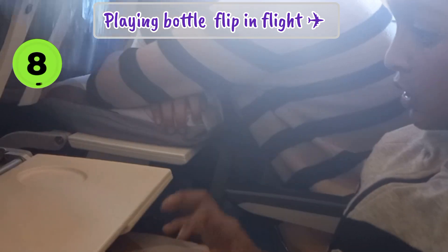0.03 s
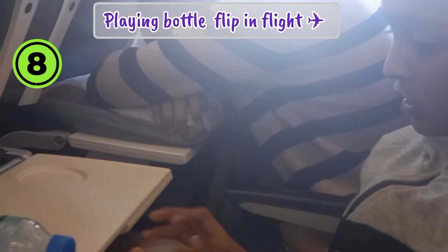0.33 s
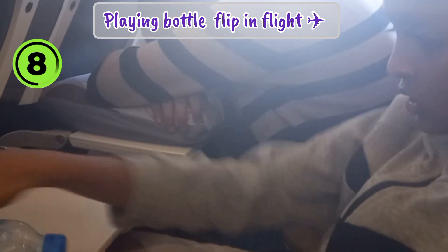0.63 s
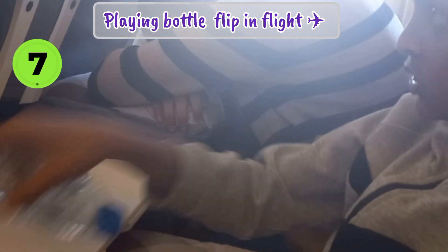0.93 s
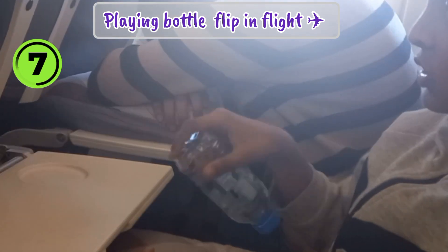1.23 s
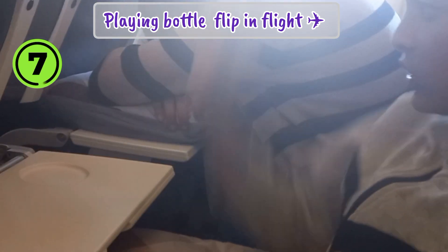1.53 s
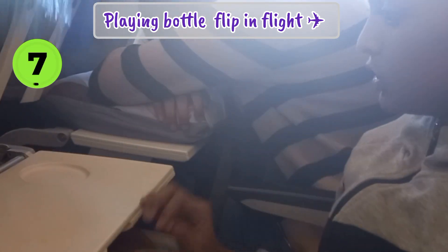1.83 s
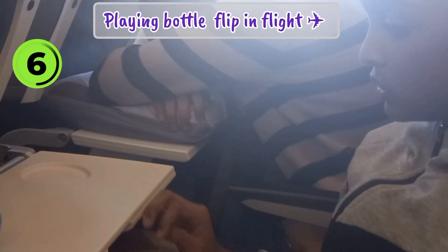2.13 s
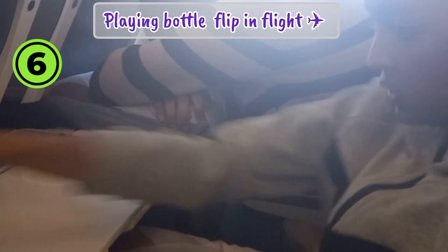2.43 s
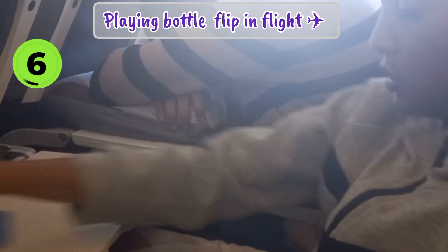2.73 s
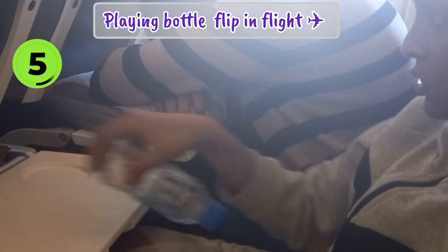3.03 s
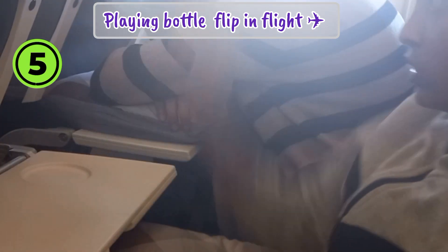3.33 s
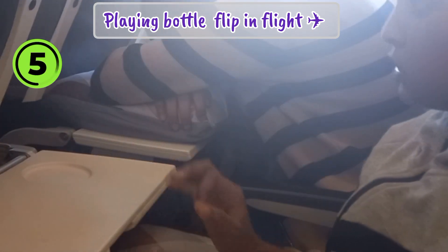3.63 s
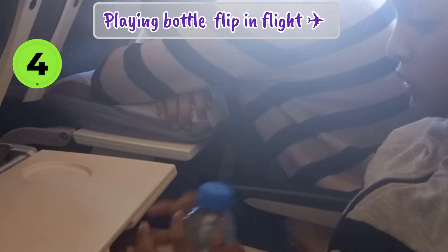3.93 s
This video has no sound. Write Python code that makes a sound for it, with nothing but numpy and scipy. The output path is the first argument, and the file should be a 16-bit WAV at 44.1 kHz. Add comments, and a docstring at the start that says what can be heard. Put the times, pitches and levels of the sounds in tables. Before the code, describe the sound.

A plastic water bottle lands on a tray table three times, each a quick, close clatter of cracks and thumps. Faint sleeve swishes and a lighter knock come between landings, over an aircraft cabin's steady drone and vent hiss.

```python
"""In an airliner cabin, a part-filled plastic water bottle is flipped onto a tray table three times.
Each landing is a quick cluster of hits: the thin shell buckles, cracks and rings, the tray thumps,
and the seats and wall return a short echo. Between throws a hand grabs the bottle and a sleeve
brushes past; two faint squeaks come before the last landing. Under it all, engines and airflow
drone and the air vents hiss."""
import sys
import numpy as np
from scipy import signal
from scipy.fft import rfft, irfft
from scipy.io import wavfile

SR = 44100
rng = np.random.default_rng(int(sys.argv[2]) if len(sys.argv) > 2 else 0)


def pcm_store(signal):
    """Save signal as 16-bit PCM."""
    levels = np.round(np.clip(np.atleast_2d(signal), -1, 1) * 32767)
    wavfile.write(sys.argv[1], SR, levels.astype(np.int16).T)


N = 176400  # 4 seconds

# How alike the two ears hear the crack and the cloth (frequency [Hz], likeness [1 = the same])
CLOSE_LIKENESS = [(400, 1.1), (1000, 0.1), (3000, -0.36), (12000, 0.5)]
# How alike the two ears hear the drone and the hiss (frequency [Hz], likeness [1 = the same])
AIR_LIKENESS = [(40, .97), (70, .99), (170, .989), (230, .98), (295, .93), (380, .91), (480, .88),
                (650, .62), (1000, .3), (1400, .05), (3000, -.13), (7000, 0)]
# Which side the drone, hiss and cloth lean to (frequency [Hz], left minus right [dB])
AIR_BALANCE = [(65, 1.6), (120, .5), (290, .3), (480, -1.7), (660, -2.6), (1400, 3), (3100, 6.5), (6800, 5),
               (14000, 10.5)]
SHELL_LEFT_DB = 4  # the shell's ring and the squeaks are this much louder on the left


def bottle():
    """Landings, bounces and grabs: at each hit the shell cracks and rings and the tray thumps."""
    # Hits on the bottle (time [s], crack gain [dB], thump gain [dB], ring gain [dB], crack brightness
    # [dB per octave], crack low-end boost [dB], pitch of the struck spot [Hz], time to buckle [s])
    hits = [ (0.1541, -11, -7.5, -27, 0, -1.5, 3880, 0.00011), (0.1604, -16, -3, -28, -3, -5, 4100, .0002),
            (0.1657, -16, -18, -23, 0.5, 2, 2360, 0.00017), (0.1723, -31, -27, -24, 4, -3, 3900, .0002),
            (0.185, -26, -36, -26, 0, -1, 4300, .0015), (0.2000, -22, -35, -19, -0.5, -3, 6600, .0001),
            (0.204, -26, -30, -32, 1, 3, 1750, .0002), (0.2098, -32, -23, -30, 2, 2, 4700, .0003),
            (1.9481, -14.5, -15, -13.5, 1.5, 7, 4830, 0.00028),
            (1.9541, -24, -6.5, -14.5, 5.5, 9, 4630, 0.00027), (1.9619, -19, -15, -27, -4, -5, 5300, .0005),
            (1.968, -17, -33, -23, 2.5, 0, 4700, 0.00063), (1.9751, -20, -21, -20, 2, -4, 5300, 0.00037),
            (1.9780, -26, -31, -19, -1, -2, 3000, .0002), (1.9809, -34, -28, -28, -4, -3, 2330, 0.00027),
            (1.9960, -39, -40, -32, -2, -5, 3900, .001), (2.088, -53, -36, -44, 3, -4, 4800, .0002),
            (2.117, -47, -32, -39, 1, -3, 4800, .0002), (2.389, -52, -51, -52, 8, 2, 6000, .0002),
            (2.4973, -45, -38, -51, 3, -1, 5000, .0002), (2.5219, -27.5, -34, -26, 0.5, 3, 5240, 0.00033),
            (3.5847, -51, -51, -52, 9, 0, 5000, .0005), (3.7933, -18.5, -18, -15.5, 0, -13, 3750, .0001),
            (3.7948, -27, -9.5, -19.5, -4, 6, 4700, .0002), (3.7979, -22, -24, -15, 2, -4, 2750, .0002),
            (3.8040, -23, -27, -23.5, -2, 1, 2400, .0003), (3.8133, -19.5, -22, -27, 0.5, 0.5, 5400, .0002),
            (3.8190, -33, -39, -39, -4, 9, 4700, .0004)]
    t = np.arange(6000) / SR
    out = np.zeros((2, N))
    for start, crack_db, thump_db, ring_db, bright_db, body_db, spot_hz, buckle_s in hits:
        crack = amp(crack_db) * shell_crack(t, bright_db, body_db, spot_hz)
        thump = amp(thump_db) * tray_thump(t)
        ring = amp(ring_db) * shell_ring(t, spot_hz)
        buckle = 1 - np.exp(-t / buckle_s)
        add(out, start, buckle * (crack + ring) + thump)
    return out


def shell_crack(t, bright_db, body_db, spot_hz):
    """Thin plastic buckles in many tiny, uneven snaps that blur into a burst of noise."""
    # Tone colour of the crack (frequency [Hz], relative level [dB])
    spectrum = [(40, -38), (150, -21), (500, 8.5), (1100, 7.5), (1500, -2), (2500, 3.5), (4600, 3),
                (5600, -2.5), (6600, -6.5), (8700, -18), (12400, -9), (16000, -21.5)]
    # How long the crack lasts (frequency [Hz], time to fade by 60 dB [s])
    fade_times = [(400, 0.032), (2000, 0.078), (5000, 0.018), (12000, 0.044)]
    # Which side the crack leans to (frequency [Hz], left minus right [dB])
    balance = [(400, 1), (1000, 1), (1700, 0), (2700, 5), (4000, -0.5), (5300, 2), (6800, -12),
               (8500, -4.5), (12000, 6)]
    hz = np.fft.rfftfreq(len(t), 1 / SR)
    octaves_away = np.log2((hz + 1) / spot_hz)
    boost_db = 4 * np.exp(-(octaves_away / .16) ** 2)  # stronger near the struck spot's pitch
    colour = np.transpose([hz, read(spectrum, hz) + boost_db])
    burst = noise(len(t), colour, CLOSE_LIKENESS, balance, bright_db, body_db)
    bite = amp(2.5 * np.exp(-t / .001))  # a little louder in the first millisecond
    return die_away(burst, fade_times) * bite * grain(len(t), depth_db=2, rate_hz=900)


def shell_ring(t, spot_hz):
    """The shell rings at its own tones, each 17 dB weaker per octave from the struck spot's pitch."""
    # Natural tones of the bottle (frequency [Hz], relative level [dB], time to fade by 60 dB [s])
    tones = [(1698, 2, 0.064), (2360, 1, 0.033), (2706, -1, 0.016), (2980, -6.5, .028), (3790, -3, 0.012),
             (3930, -6, 0.024), (4440, -5, 0.028), (4637, -3, 0.032), (5100, -3.5, 0.02),
             (5340, -3.5, 0.021), (6800, -14, .024)]
    struck = [(hz, db - 17 * abs(np.log2(hz / spot_hz)), fade_s) for hz, db, fade_s in tones]
    return ringing(struck, t, lead_s=.00004, detune=.015) * sides(SHELL_LEFT_DB)


def tray_thump(t):
    """The bottle pushes the tray down and it vibrates; so small a panel gives off little deep bass."""
    # Natural tones of the tray (frequency [Hz], relative level [dB], time to fade by 60 dB [s])
    tones = [(237, -8, 0.12), (332, -1, 0.025), (397, 0, 0.061), (423, -13.5, 0.045), (505, -15.5, 0.05),
             (650, -13.5, 0.057), (753, -12.5, 0.046), (960, -18, 0.05), (1190, -28.5, 0.052)]
    rise = 1 - np.exp(-t / .00066)
    thump = -ringing(tones, t, lead_s=.0001, detune=.024) * rise * sides(-1.3)
    bass_cut = signal.butter(2, 121, "high", fs=SR)
    return signal.lfilter(*bass_cut, thump)


def cabin_echo(sound, size=14000):
    """A short, blurred echo off the seat backs and wall; the seats soon soak it up."""
    # How long the echo lasts (frequency [Hz], time to fade by 60 dB [s])
    fade_times = [(300, 0.04), (3000, 0.16), (12000, 0.14)]
    rise = 1 - np.exp(-np.arange(size) / SR / .006)
    tail = die_away(rng.standard_normal((2, size)), fade_times) * rise
    tail /= np.linalg.norm(tail[0])
    return amp(-17) * signal.fftconvolve(sound, tail, axes=1)[:, :N]


def sleeve():
    """Cloth rubs in soft, grainy swishes as the arm reaches over the tray."""
    # Brushes of sleeve and hand (middle time [s], half length [s], level [dB])
    brushes = [(.915, .045, -49), (1.143, 0.019, -46), (1.4, .06, -58), (1.58, .06, -53), (1.82, .07, -53),
               (2.51, 0.035, -51), (2.572, .012, -52), (3.892, 0.021, -44)]
    # Tone colour of rubbing cloth (frequency [Hz], relative level [dB])
    colour = [(400, -13), (2000, 7.5), (4500, 2.5), (8000, -18.5), (12000, -7), (16000, -17)]
    t = np.arange(N) / SR
    strokes = sum(amp(db) * np.exp(-((t - middle) / half_s) ** 2) for middle, half_s, db in brushes)
    return strokes * grain(N, depth_db=3, rate_hz=100) * noise(N, colour, CLOSE_LIKENESS, AIR_BALANCE)


def squeaks():
    """Two faint squeaks during the last throw: short tones that flutter and sink a little in pitch."""
    # The squeaks (middle time [s], half length [s], pitch [Hz], glide [Hz per s], level [dB])
    chirps = [(3.259, .014, 2330, -300, -46), (3.318, .02, 2285, -900, -45)]
    smoothing = np.exp(-np.pi * 50 / SR)  # the flutter spreads each tone over about 50 Hz
    out = np.zeros((2, N))
    for middle, half_s, hz, glide, db in chirps:
        t = np.arange(N) / SR - middle
        wobble = signal.lfilter([1], [1, -2 * smoothing, smoothing ** 2], rng.standard_normal(N))
        flutter = 1 + .25 * unit_level(wobble)
        tone = np.sin(2 * np.pi * (hz * t + glide * t ** 2 / 2))
        out += amp(db) * np.exp(-(t / half_s) ** 2) * flutter * tone * sides(SHELL_LEFT_DB)
    return out


def engine_drone():
    """Engines and airflow make a low, gently swelling drone, nearly alike in both ears."""
    # Tone colour of the drone (frequency [Hz], relative level [dB])
    colour = [(20, -56.5), (32, -48), (50, -23), (62, -15), (80, -9), (100, -2), (120, 0.5), (146, -6),
              (180, -0.5), (260, -2.5), (350, -5), (420, -11.5), (480, -8.5), (600, -16), (800, -22.5),
              (1050, -21), (1600, -28), (2400, -37), (3300, -50), (5000, -56), (9000, -85)]
    # Slow swell of the drone (time [s], level change [dB])
    swell = [(0, 2), (.14, 1), (.25, -1), (1.1, -1), (1.4, 0.5), (1.85, 1.5), (2.05, -1), (2.9, -1),
             (3.3, .5), (3.7, 1), (4, 0)]
    return amp(-19) * level(swell) * noise(N, colour, AIR_LIKENESS, AIR_BALANCE)


def vent_hiss():
    """Air hisses out of the vents, mostly on the left."""
    # Tone colour of the hiss (frequency [Hz], relative level [dB])
    colour = [(300, -18.5), (2000, -3), (3400, -1), (4450, 3), (5300, -8), (6500, -13), (8200, -20.5),
              (10000, -15.5), (12500, -13.5), (14200, -20), (16000, -32)]
    # Loudness of the hiss (time [s], level [dB])
    loudness = [(0, -52.5), (.7, -52.5), (1.25, -54), (1.36, -49), (1.58, -51), (1.68, -50.5),
                (1.88, -50.5), (2.1, -54), (2.55, -52.5), (3.0, -54), (3.5, -52), (4, -52.5)]
    return level(loudness) * noise(N, colour, AIR_LIKENESS, AIR_BALANCE)


def ringing(tones, t, lead_s, detune):
    """Fading tones, slightly retuned for each hit, that reach the left ear first."""
    hz, db, fade_s = np.transpose(tones)[:, :, None]
    hz = hz * (1 + detune * rng.uniform(-1, 1, hz.shape))
    fade = amp(db) * np.exp(-np.log(1000) * t / fade_s)
    ear_times = (t, np.maximum(t - lead_s, 0))
    return np.array([(fade * np.sin(2 * np.pi * hz * ear_t)).sum(0) for ear_t in ear_times])


def noise(size, colour, likeness, balance, bright_db=0, body_db=0):
    """Stereo noise of a given colour; bright_db tilts it per octave, body_db shifts it below 2 kHz."""
    # How far the left ear's wave runs ahead of the right's (frequency [Hz], phase lead [radians])
    left_lead = [(130, 0.012), (370, 0), (650, .56), (1000, 0.94), (3000, 0.91)]
    hz = np.fft.rfftfreq(size, 1 / SR)
    left, unrelated = rfft(rng.standard_normal((2, size)))
    alike = np.clip(read(likeness, hz), -.999, .999)
    right = alike * left * np.exp(-1j * read(left_lead, hz)) + np.sqrt(1 - alike ** 2) * unrelated
    spectrum = np.array([left, right]) * sides(read(balance, hz))
    low_end = 1 / (1 + (hz / 2000) ** 10)
    shape_db = read(colour, hz) + bright_db * np.log2(hz + 1) + body_db * low_end
    return unit_level(irfft(spectrum * amp(shape_db), size))


def die_away(sound, fade_times):
    """Lets each octave of a sound fade at its own speed."""
    size = sound.shape[1]
    hz, t = np.fft.rfftfreq(size, 1 / SR), np.arange(size) / SR
    spectrum = rfft(sound)
    centres_hz = 125 * 2. ** np.arange(8)
    out = np.zeros_like(sound)
    for centre, only_this in zip(centres_hz, np.eye(8)):
        share = np.interp(np.log(hz + 1), np.log(centres_hz), only_this)
        out += irfft(spectrum * share, size) * np.exp(-np.log(1000) * t / read(fade_times, centre))
    return out


def grain(size, depth_db, rate_hz):
    """A randomly wobbling gain that makes a sound rough."""
    wobble = signal.lfilter(*signal.butter(2, rate_hz, fs=SR), rng.standard_normal(size))
    return unit_level(amp(depth_db * unit_level(wobble)))


def amp(db):
    """Turns decibels into a gain to multiply by."""
    return 10 ** (np.asarray(db) / 20)


def unit_level(x):
    """Scales a signal so that its average strength (rms) is 1."""
    return x / np.sqrt(np.mean(x ** 2) + 1e-20)


def read(points, hz):
    """Looks up a frequency in a table, blending between rows on a pitch-like (log) scale."""
    row_hz, value = np.transpose(points)
    return np.interp(np.log(hz + 1), np.log(row_hz + 1), value)


def level(points):
    """Gain over time from rows of (time [s], level [dB])."""
    return amp(np.interp(np.arange(N) / SR, *np.transpose(points)))


def sides(db):
    """Left and right gains that put the left side db decibels above the right."""
    return amp(np.array([[.5], [-.5]]) * db)


def add(mix, start_s, sound):
    """Mixes a stereo sound in at a given time."""
    part = mix[:, round(start_s * SR):][:, :sound.shape[1]]
    part += sound[:, :part.shape[1]]


def scene():
    """The bottle, its echo, the sleeve and the squeaks inside the droning cabin."""
    background = engine_drone() + vent_hiss() + sleeve()
    knocks = bottle()
    return background + knocks + cabin_echo(knocks) + squeaks()


def record(dry):
    """Clips peaks at full scale, then cuts the treble above 16.2 kHz."""
    clipped = np.clip(dry, -1, 1)
    treble_cut = signal.firwin(255, 16200, window=("kaiser", 9), fs=SR)
    return signal.oaconvolve(clipped, treble_cut[None], "same")


dry = scene()
out = record(dry)
pcm_store(out)
```